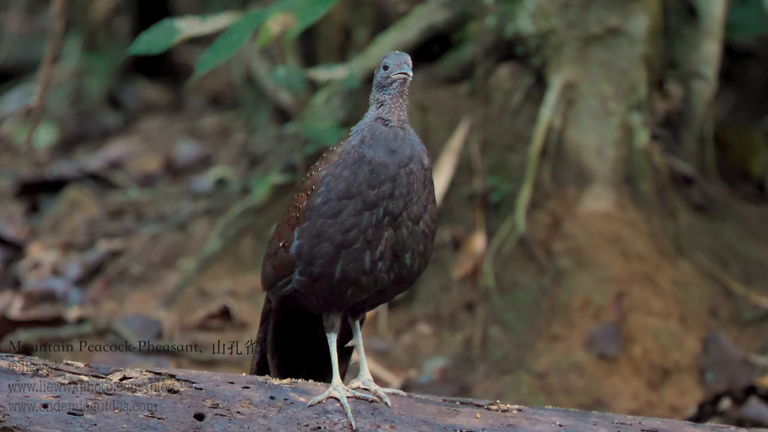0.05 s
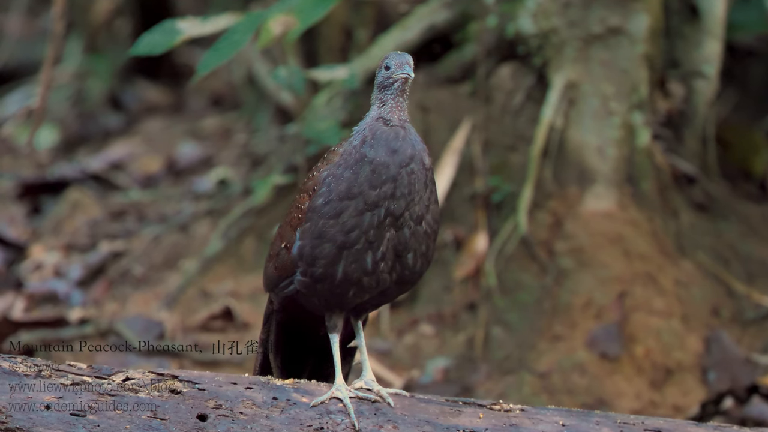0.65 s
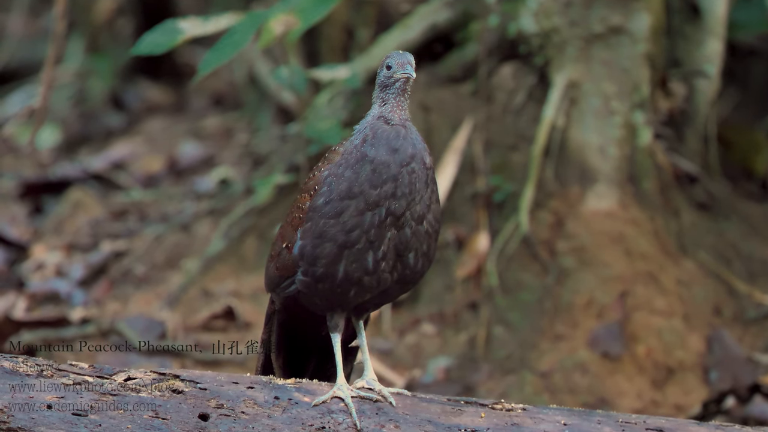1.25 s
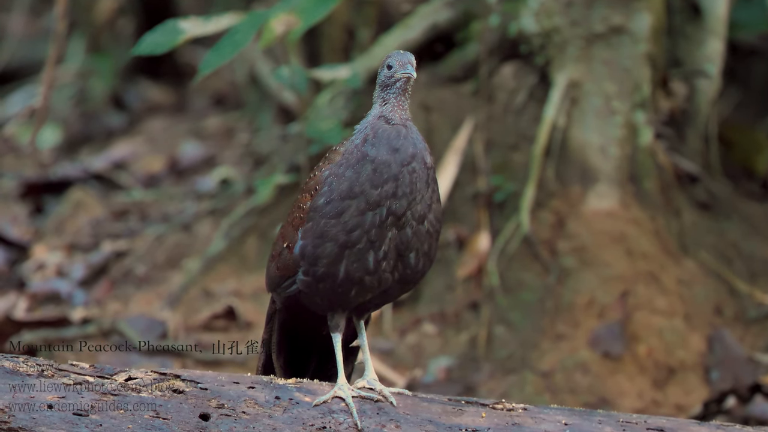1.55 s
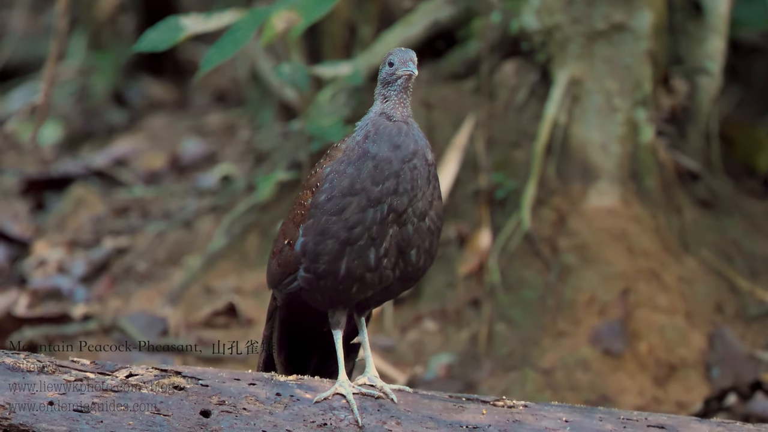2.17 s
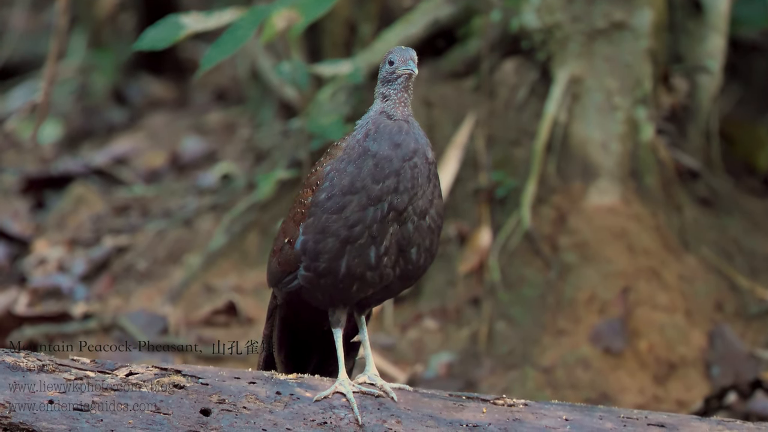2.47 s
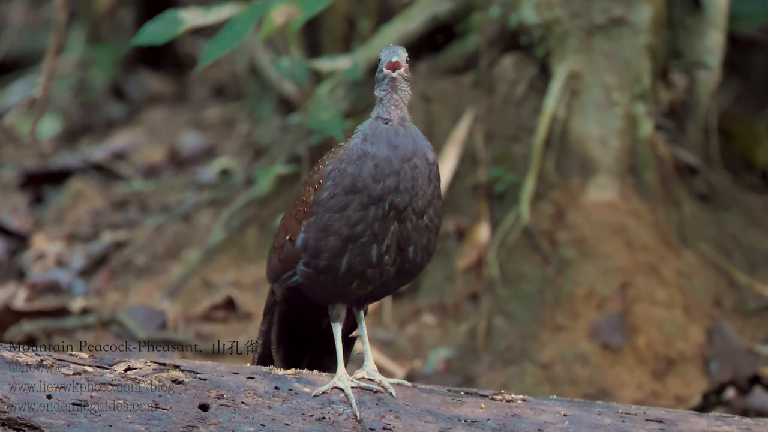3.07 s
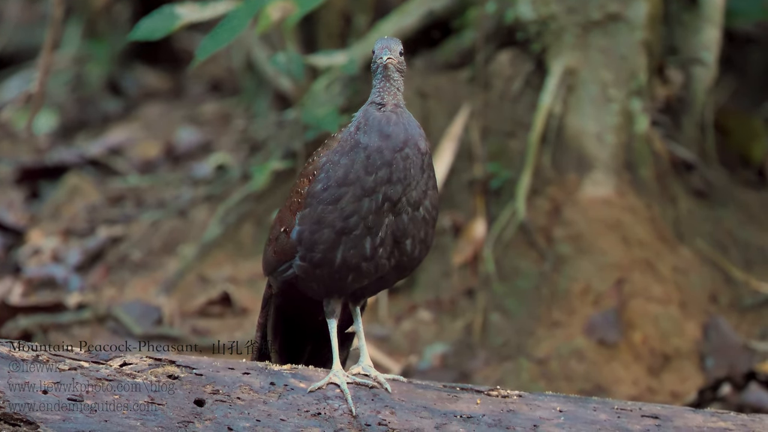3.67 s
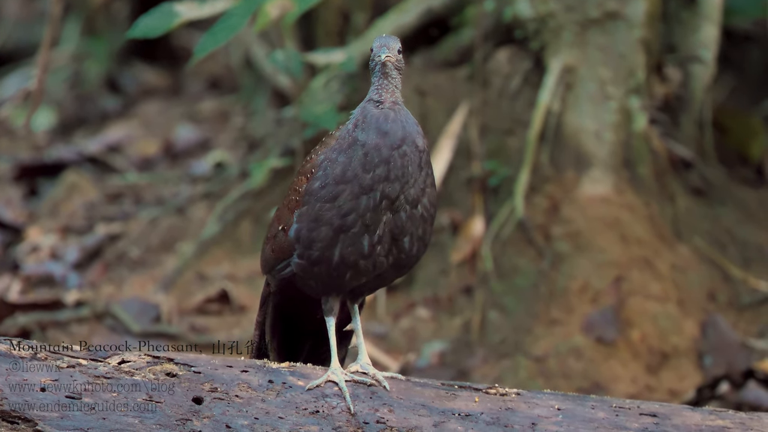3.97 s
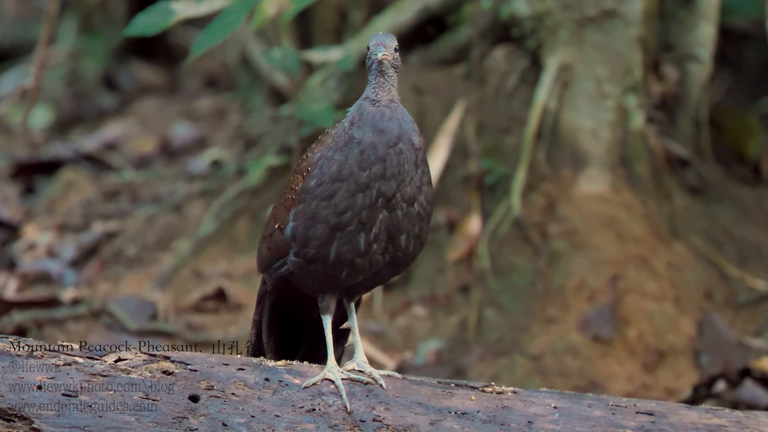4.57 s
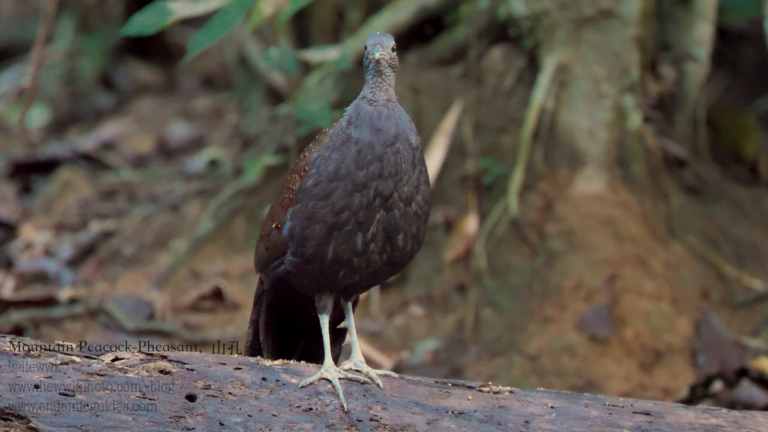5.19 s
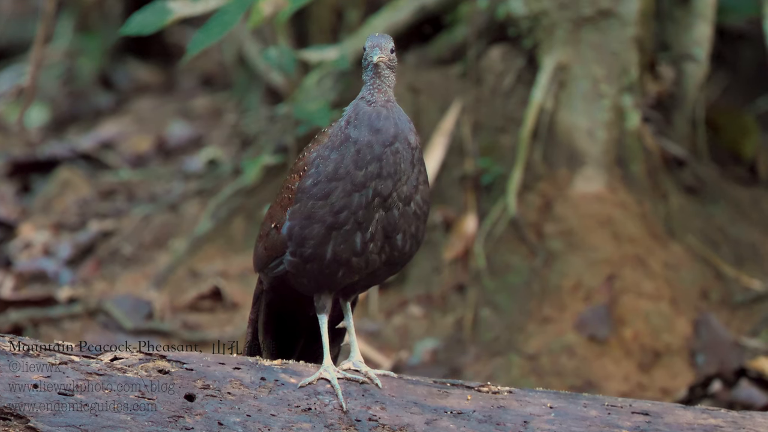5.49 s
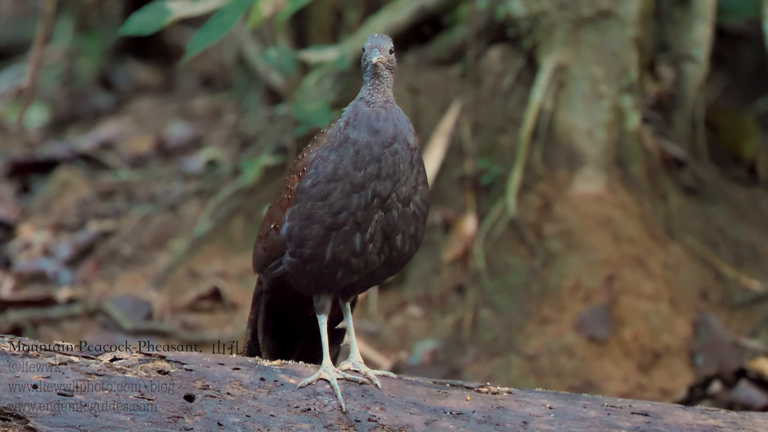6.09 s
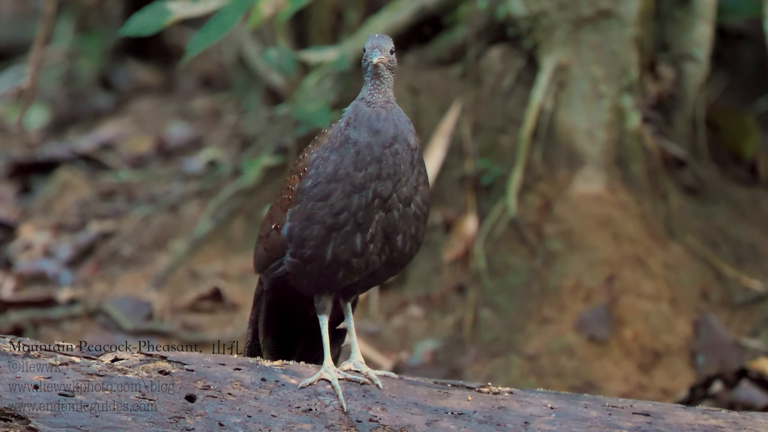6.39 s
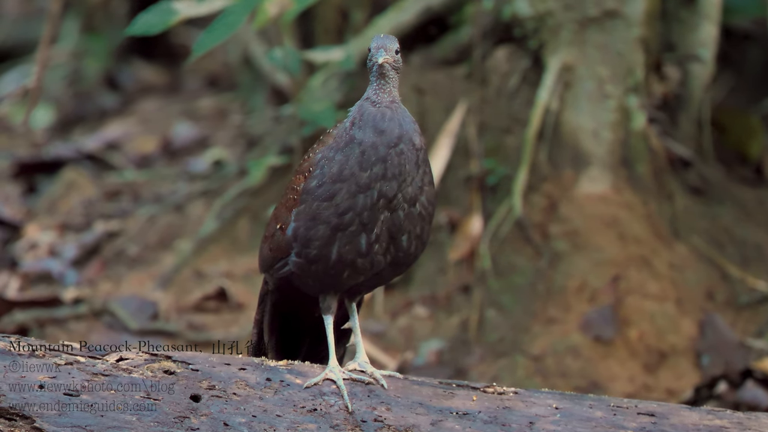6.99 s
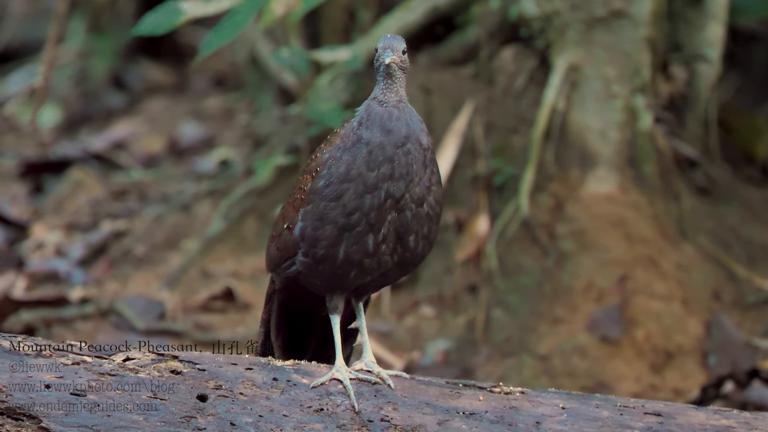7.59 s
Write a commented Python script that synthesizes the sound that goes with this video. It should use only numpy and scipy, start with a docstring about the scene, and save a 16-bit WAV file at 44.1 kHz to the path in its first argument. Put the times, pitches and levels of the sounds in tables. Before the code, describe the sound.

A nearby pheasant squawks twice, loud and raspy, each short note breaking from a growl into a fluttering cry with a brief forest echo. Before and after, the forest is quiet: a soft hiss, gently swelling insects, a thin high cricket and faint distant bird calls. Small ticks of falling debris come now and then, and a quick double crackle of dry leaves follows a while after the calls.

```python
"""Pheasant in a tropical forest.

A pheasant on a log gives two harsh, warbling notes: its syrinx vibrates, throat and windpipe resonate,
and the trees scatter the sound. Dry leaves crackle twice nearby and debris ticks on the forest floor.
A cricket chirps by scraping its wings, insects chirr all around and small birds call far away,
over a low murmur and a steady hiss."""
import sys
import numpy as np
from scipy import signal
from scipy.fft import rfft, irfft, next_fast_len
from scipy.io import wavfile
from scipy.ndimage import map_coordinates

SR = 44100
rng = np.random.default_rng(int(sys.argv[2]) if len(sys.argv) > 2 else 0)


def waveform_to_disk(signal):
    """Save audio, clipped to [-1, 1], as 16-bit WAV at the path in sys.argv[1]."""
    frames = np.transpose(np.atleast_2d(signal))
    scaled = np.clip(frames, -1, 1) * 32767
    samples = np.round(scaled).astype(np.int16)
    wavfile.write(sys.argv[1], SR, samples)


N = 346185
TIME = np.arange(N) / SR


# Resonances of the throat and open beak. Each row: frequency in Hz, gain in dB.
THROAT = [(250, -11), (550, -31), (850, -21), (1200, -12.5), (1450, -2.5), (1680, -2.5), (1850, -11),
          (2080, -31.5), (2600, -47.5), (3350, -31), (4100, -67), (5000, -37.5), (7600, -38.5), (9000, -71)]

def voiced_tone(pitch, phase, fundamental_db):
    """Source and filter: each harmonic of the syrinx is weighted by the throat as it sweeps through."""
    k = np.arange(1, 17)[:, None]
    gains = amp(along(THROAT, k * pitch) + fundamental_db * (k == 1))
    tone = np.sqrt(2) * np.sum(gains * np.sin(k * phase), axis=0)
    slackness = np.clip(1.2 - pitch / 800, 0, 1)  # a slack membrane flaps unevenly
    return tone * (1 + .25 * slackness * wobble(600, len(pitch)))


# Spectrum of air torn at the syrinx. Each row: frequency in Hz, relative level in dB.
RASP = [(500, -33.5), (900, -8.5), (1700, -1), (2600, -7), (3550, -5), (4000, -36), (4900, -9),
        (7700, -5.5), (8500, -14.5), (9100, -41), (10800, -18), (12000, -6.5), (13800, -22.5),
        (16000, -28.5)]
# Narrow resonances of the windpipe. Each row: centre in Hz, width in Hz, lift in dB.
WINDPIPE = [(3390, 240, 7), (5020, 140, 11), (5850, 220, 5.5), (7300, 280, 5), (7660, 160, 5.5)]

def rasp(phase):
    """Pulsed turbulence: air escapes in uneven puffs, once a cycle, and rings the windpipe."""
    puffs = rng.standard_normal(len(phase)) * (1 + np.cos(phase)) * amp(1.5 * wobble(250, len(phase)))
    pipe_db = lambda hz: sum(lift * band(centre, width)(hz) for centre, width, lift in WINDPIPE)
    return unit(filtered(puffs, lambda hz: amp(along(RASP, hz) + pipe_db(hz))))


SLACK_HZ, GROWL_RISE_S, BREAK_S, CRY_RISE_S, DROP_S = 262.6, .0105, .032, .014, .015
WARBLE_HZ, CREST_AT_S, WARBLE_GROW_S, WARBLE_TONE_DB, WARBLE_RASP_DB = 46.1, .1, .027, 2, 4
HARSH_AT_S, HARSH_SPREAD_S = .039, .019
JITTER, BREAK_JITTER = .009, .024  # shares of the pitch

def squawk(attack, length, release, growl_hz, cry_hz, growl_db, cry_db, sag_db_per_s,
           depth, fundamental_db, rasp_db, flare_db):
    """Tension sets pitch: the membrane tightens to a growl, breaks into a warbling cry and slackens."""
    t = np.arange(0, length + 2 * release, 1 / SR)
    crying = settle(t - BREAK_S, CRY_RISE_S)
    held = 1 - settle(t - length, DROP_S)
    breaking = np.exp(-((t - HARSH_AT_S) / HARSH_SPREAD_S) ** 2)
    turn = 2 * np.pi * WARBLE_HZ * (t - CREST_AT_S)
    swing = np.cos(turn) + .15 * np.cos(2 * turn)  # crests sharper than troughs
    warble = settle(t - BREAK_S, WARBLE_GROW_S) ** 2 * held * swing
    rise_hz = (growl_hz - SLACK_HZ) * settle(t, GROWL_RISE_S) + (cry_hz - growl_hz) * crying
    jitter = (JITTER + BREAK_JITTER * breaking) * wobble(700, len(t))
    pitch = (SLACK_HZ + held * rise_hz) * (1 + depth * warble + jitter)
    phase = 2 * np.pi * np.cumsum(pitch) / SR
    db = growl_db + (cry_db - growl_db) * crying - sag_db_per_s * np.maximum(t - BREAK_S, 0)
    release_db = -33 * (np.maximum(t - length, 0) / release) ** 2
    envelope = amp(db + release_db) * settle(t, attack) ** 3
    tone = amp(WARBLE_TONE_DB * warble) * voiced_tone(pitch, phase, fundamental_db)
    breath = amp(rasp_db + flare_db * breaking + WARBLE_RASP_DB * warble) * rasp(phase)
    return envelope * (tone + breath)


# The pheasant's notes. Each row: start, attack, length and release in seconds, growl and cry pitch in Hz,
# growl and cry gain in dB, sag in dB per second, warble depth as a share of the pitch, then fundamental
# gain, rasp gain, rasp flare at the break, reverberation gain and pan, all in dB.
NOTES = [(2.625, 0.011, .17, 0.034, 532.2, 888.8, -18.5, -13, 17.5, 0.165, 0, -27.5, 8.5, -0.5, .3),
         (3.024, .0075, .146, .02, 621, 859.4, -17, -12, 50.5, 0.085, -3, -29, 11, -1, -1.5)]
# Reflections from log, ground and nearest trunks. Each row: delay in seconds, gain in dB.
REFLECTIONS = [(.0013, -19.5), (.0045, -36), (.0059, -29), (.0095, -22), (0.0179, -24)]

def pheasant():
    """Interference: early reflections comb-filter each note before it reverberates among the trees."""
    comb = lambda hz: 1 + sum(amp(db) * np.exp(-2j * np.pi * hz * delay) for delay, db in REFLECTIONS)
    out = np.zeros((2, N))
    for start, *voice, wet_db, pan_db in NOTES:
        call = np.zeros(N)
        add(call, start, squawk(*voice))
        out += forest(filtered(call, comb), wet_db, pan_db)
    return out


def tick(db, centre_hz, octaves, rise_s, decay_s):
    """Impact excitation: a noise burst, dying 30 dB in decay_s, drives one broad resonance."""
    t = np.arange(SR // 10) / SR
    resonance = lambda hz: 1 / (1 + (np.log2((hz + 1) / centre_hz) / octaves) ** 2)
    # thin in the bass, with a dip near 9 kHz
    colour = lambda hz: resonance(hz) * hz / (hz + 300) * amp(-14 * band(9100, 1000)(hz))
    envelope = amp(-30 * t / decay_s) * settle(t, rise_s) ** 2
    envelope /= envelope.max()
    burst = filtered(envelope * rng.standard_normal(len(t)), colour)
    return amp(db - 14) * unit(burst) * np.std(envelope)


# Spectrum of rubbing leaves. Each row: frequency in Hz, relative level in dB.
LEAF = [(100, -48), (280, -8.5), (530, -16), (950, -3.5), (1600, 0.5), (2700, -7), (3350, -1.5),
        (4300, -11.5), (5400, -12), (7300, -4), (9000, -20.5), (12000, -16.5), (15500, -25)]
# Leaves dragged over the ground. Each row: start in seconds, length in seconds, level in dB.
SCUFFS = [(5.445, 0.064, -40.5), (5.557, 0.054, -36)]
# Leaves and twigs snapping. Each row: start in seconds, relative level in dB, resonance in Hz,
# width in octaves, decay in seconds.
SNAPS = [(4.126, -31.5, 11200, 1.4, 0.007), (5.447, -18.5, 2900, 0.94, 0.0028),
         (5.478, -21, 2000, 2.2, 0.018), (5.4982, -11, 1660, .92, 0.013), (5.503, -24.5, 2000, 4.5, 0.06),
         (5.563, -12.5, 1484, 0.29, 0.014), (5.5952, -17.5, 1790, 0.81, 0.0097),
         (5.5982, -15.5, 2200, 3.6, 0.013), (5.6095, -45, 1310, 1.34, .012)]
SNAP_RISE_S = .00035

def dry_leaves():
    """Friction and brittle fracture: leaves drag grainily, and each snap opens with a bright crack."""
    grains = rng.standard_normal(N) * amp(3.5 * wobble(1500))
    drag = sum(amp(db) * swell(start, length, rise_s=.0022, fall_s=.011) for start, length, db in SCUFFS)
    leaves = drag * unit(filtered(grains, lambda hz: amp(along(LEAF, hz))))
    for start, db, hz, octaves, decay_s in SNAPS:
        add(leaves, start, tick(db, hz, octaves, SNAP_RISE_S, decay_s))
        crack = tick(db - 3.5, centre_hz=8930, octaves=.91, rise_s=SNAP_RISE_S, decay_s=.0015)
        add(leaves, start + SNAP_RISE_S, crack)
    pair = forest(leaves, wet_db=-17.5, pan_db=-7)
    lag_s = .35 / SR * np.array([[1], [-1]])  # the sound arrives a hair later on the left
    return filtered(pair, lambda hz: np.exp(-2j * np.pi * hz * lag_s))


# Debris landing. Each row: start in seconds, relative level in dB, resonance in Hz,
# width in octaves, decay in seconds.
LANDINGS = [(0.67, -44.5, 6370, 0.41, .02), (1.032, -40, 6800, 0.28, .039), (2.122, -45, 5900, .18, 0.033),
            (2.194, -31, 1480, .85, 0.039), (3.619, -36, 4150, 0.32, 0.038),
            (4.264, -39.5, 7260, .3, 0.056), (5.354, -46, 7050, .6, .013), (6.874, -28, 2280, 0.4, 0.022),
            (7.384, -31.5, 1520, 1, 0.041)]

def debris():
    """Soft impact: bits landing on the forest floor tick with a blunted onset."""
    out = np.zeros(N)
    for start, db, hz, octaves, decay_s in LANDINGS:
        add(out, start, tick(db, hz, octaves, rise_s=.0038, decay_s=decay_s))
    return forest(out, wet_db=-9, pan_db=-6)


# Bouts of even chirping. Each row: start in seconds, chirp period in seconds, number of chirps,
# wing strokes per chirp.
BOUTS = [(.417, .202, 3, 2), (.98, .157, 2, 2), (1.402, .22, 2, 2), (1.9, .228, 4, 2), (2.957, .246, 3, 2),
         (3.672, .208, 4, 2), (4.457, .087, 6, 1), (5.022, .193, 3, 2), (5.675, .183, 3, 2),
         (6.272, .221, 4, 2), (7.123, .2, 4, 2)]
STROKE_GAP_S = .047

def cricket(pitch_hz, stroke_s, db):
    """Stridulation: each wing stroke scrapes out a short tone that sags a little in pitch."""
    out, progress = np.zeros(N), np.arange(0, 1, 1 / (stroke_s * SR))
    centres = [start + i * period + j * STROKE_GAP_S
               for start, period, chirps, strokes in BOUTS for i in range(chirps) for j in range(strokes)]
    for centre in centres:
        hz = pitch_hz * (1 + .018 * (.5 - progress) + .0082 * wobble(447, len(progress)))
        start = centre - stroke_s / 2 + rng.normal(0, .0022)
        add(out, start, amp(db + rng.normal(0, 1)) * np.sin(np.pi * progress) * sine(hz))
    return forest(out, wet_db=-4, pan_db=-7.5)


# Swells of the insect chorus. Each row: crest time in seconds, width in seconds, lift in dB.
CHORUS_SWELLS = [(.4, .13, 4), (1.02, 0.23, 8), (1.72, .24, 9.5), (2.33, 0.19, 9.5), (3.02, 0.2, 8),
                 (3.88, 0.28, 7), (4.55, 0.15, 7.5), (5.04, 0.15, 10.5), (5.721, 0.26, 10), (6.42, 0.25, 9),
                 (7.08, 0.2, 10), (7.42, 0.17, 8), (7.79, 0.13, 9.5)]

def insect_chorus():
    """Incoherent summation: many insects merge into bands of noise, one swelling and three steady."""
    lift_db = sum(lift * np.exp(-((TIME - crest) / width) ** 2) for crest, width, lift in CHORUS_SWELLS)
    swelling = amp(-69.5 + lift_db + wobble(90)) * diffuse(band(4274, 190))
    steady = amp(-66) * diffuse(band(4450, 140))
    far_crickets = amp(-68.5) * diffuse(band(6470, 460))
    shrill = amp(-77.5) * diffuse(band(15480, 90))
    return swelling + steady + far_crickets + shrill


# Spells of louder whining. Each row: start in seconds, length in seconds, lift in dB.
WHINE_SWELLS = [(1.65, 0.55, 5), (5.145, 1.08, 5)]

def insect_whine():
    """Narrowband noise is heard as a pitch: a low whine that grows as the insect presses harder."""
    lift_db = sum(lift * swell(start, length, rise_s=.096, fall_s=.096)
                  for start, length, lift in WHINE_SWELLS)
    return amp(-66.5 + lift_db) * diffuse(band(2066, 70))


def insect_trill(pitch_hz, rate_hz, db):
    """Amplitude modulation: a small insect's even strokes chop one wavering tone into ticks."""
    strokes = (1 + np.cos(2 * np.pi * np.cumsum(rate_hz + .77 * wobble(3)) / SR)) ** 2
    scrape = sine(pitch_hz * (1 + .023 * wobble(400)))
    return forest(amp(db) * unit(strokes * scrape), wet_db=-5, pan_db=-1.5)


# A katydid's sizzles. Each row: start in seconds, length in seconds, level approached in dB.
SIZZLES = [(0.297, .85, -58), (6.003, 1.33, -61.5)]

def katydid():
    """Broadband stridulation: a very high sizzle builds up slowly, then stops."""
    envelope = sum(amp(db) * swell(start, length, rise_s=.6, fall_s=.07) for start, length, db in SIZZLES)
    return envelope * diffuse(band(14900, 3700))


def whistle(length, pitch_hz, fall, wander):
    """Frequency modulation: a pure note slides down and wavers, each by a share of its pitch."""
    progress = np.arange(0, 1, 1 / (length * SR))
    hz = pitch_hz * (1 + fall * (.5 - progress)) * (1 + wander * wobble(600, len(progress)))
    return np.sqrt(np.abs(np.sin(np.pi * progress))) * sine(hz)


# Thin whistles. Each row: start and length in seconds, pitch in Hz, relative level in dB,
# wander as a share of the pitch.
WHISTLES = [(0.75, 0.28, 3770, -62, .004), (0.966, 0.41, 4100, -71, 0.0059),
            (1.238, .25, 2920, -67.5, 0.011), (1.315, 0.19, 7460, -62, 0.056),
            (1.35, .18, 8200, -61, 0.031), (1.408, 0.21, 3390, -63.5, 0.012),
            (1.644, 0.18, 4720, -67, .009)]
# Runs of falling hoots. Each row: start in seconds, number of hoots, level in dB.
HOOTS = [(2.345, 2, -58), (4.113, 1, -57.5), (4.218, 1, -55.5), (5.862, 2, -56.5), (6.79, 3, -53.5),
         (7.543, 1, -61), (7.717, 2, -54.5)]
HOOT_HZ, HOOT_S, HOOT_GAP_S = 1040, .036, .053

def far_birds():
    """Reverberation conveys distance: much of each whistle and hoot arrives scattered by the trees."""
    whistles, hoots = np.zeros((2, N))
    for start, length, hz, db, wander in WHISTLES:
        add(whistles, start, amp(db - 4) * whistle(length, hz, fall=.004, wander=wander))
    for start, count, db in HOOTS:
        for i in range(round(count)):
            add(hoots, start + i * HOOT_GAP_S, amp(db) * whistle(HOOT_S, HOOT_HZ, fall=.22, wander=.0038))
    return forest(whistles, wet_db=4, pan_db=0) + forest(hoots, wet_db=-4, pan_db=0)


# Spectra of the distant murmur and the hiss above it. Each row: frequency in Hz, relative level in dB.
MURMUR = [(25, -61), (50, -39), (80, -10.5), (130, 0), (190, 0), (330, -2), (540, -6.5), (635, -3.5),
          (780, -9), (940, -1), (1400, -11.5), (1900, -9.5), (2600, -18), (4000, -44.5)]
HISS = [(1000, -7.5), (3000, 3), (3800, 0.5), (6200, -3.5), (8000, -6), (9100, -16), (10000, -9),
        (10800, -10), (12000, -2.5), (15600, 0)]
EBB_DB_PER_S = .3864

def air():
    """Ambient noise: the forest's low murmur slowly ebbs under a steady hiss."""
    murmur_db = -56 - EBB_DB_PER_S * TIME + .19 * wobble(17)
    murmur = amp(murmur_db) * diffuse(lambda hz: amp(along(MURMUR, hz)))
    hiss = amp(-60) * diffuse(lambda hz: amp(along(HISS, hz))) * amp([[-.7], [.7]])
    return murmur + hiss


# Spectrum thrown back by trunks and foliage. Each row: frequency in Hz, relative level in dB.
SCATTER = [(400, 0), (850, -6), (1500, -0.5), (3300, -1), (6500, 1), (12000, -1)]
# Decay among the trees. Each row: frequency in Hz, nominal reverberation time in seconds.
DECAY_TIMES = [(200, 0.24), (900, 0.81), (1650, 0.78), (3300, 1), (7000, 0.98), (12000, 0.57)]

def forest(x, wet_db, pan_db):
    """Multiple scattering: a diffuse tail follows the direct sound, which positive pan moves left."""
    scatter_noise = diffuse(lambda hz: amp(along(SCATTER, hz)), size=SR)
    hz, t, spectrum = signal.stft(scatter_noise, SR, nperseg=256)
    fall_db = -60 * t / along(DECAY_TIMES, hz)[:, None]
    # near trunks answer quickly, the deep forest faintly and for longer
    decay = (amp(fall_db * 1.69) + amp(fall_db * .6 - 16.5)) * settle(t, .00059)
    tail = signal.istft(spectrum * decay, SR, nperseg=256)[1]
    scattered = signal.fftconvolve(x[None], tail / np.linalg.norm(tail[0]), axes=1)[:, :N]
    return x * amp([[pan_db / 2], [-pan_db / 2]]) + amp(wet_db) * scattered


# Likeness of left and right. Each row: frequency in Hz, correlation from 0 to 1.
COHERENCE = [(100, 1), (500, 0.99), (1000, 0.66), (3000, 0.56), (7000, 0.34), (15000, 0.063)]

def diffuse(response, size=N):
    """A diffuse field: stereo noise of rms 1, coherent in the bass and unrelated in the treble."""
    angle = lambda hz: np.arccos(np.clip(along(COHERENCE, hz), -1, 1)) / 2
    split = lambda hz: response(hz) * np.array([np.cos(angle(hz)), np.sin(angle(hz))])
    mid, side = filtered(rng.standard_normal((2, size)), split)
    return unit(np.array([mid + side, mid - side]))


def amp(db):
    """Decibels to gain."""
    return 10 ** (np.asarray(db) / 20)


def unit(x):
    """Normalisation to rms 1."""
    return x / np.sqrt(np.mean(x ** 2) + 1e-20)


def along(points, hz):
    """Interpolation of (Hz, value) points on a log frequency axis."""
    freqs, values = np.transpose(points)
    return np.interp(np.log(hz + 1), np.log(freqs + 1), values)


def sine(hz):
    """An oscillator: phase is the integral of frequency."""
    return np.sin(2 * np.pi * np.cumsum(hz) / SR)


def wobble(rate, size=N):
    """Smooth random modulation, rate knots a second."""
    return map_coordinates(rng.standard_normal(int(size * rate / SR) + 4), [np.arange(size) * rate / SR])


def filtered(x, response):
    """Linear filtering: the spectrum of x times a frequency response."""
    size = x.shape[-1]
    padded = next_fast_len(size + 4096)
    return irfft(rfft(x, padded) * response(np.fft.rfftfreq(padded, 1 / SR)), padded)[..., :size]


def band(centre_hz, width_hz):
    """A resonance curve, its width taken at half amplitude."""
    return lambda hz: 1 / (1 + ((hz - centre_hz) / width_hz * 2) ** 2)


def settle(t, time_s):
    """Exponential approach from 0 to 1, beginning at t = 0."""
    return 1 - np.exp(-np.maximum(t, 0) / time_s)


def swell(start, length, rise_s, fall_s):
    """An envelope of exponential attack and release."""
    return settle(TIME - start, rise_s) * (1 - settle(TIME - start - length, fall_s))


def add(track, start, sound):
    """Superposition of a sound on the track, from start in seconds."""
    part = track[round(start * SR):][:len(sound)]
    part += sound[:len(part)]


def scene():
    """Superposition: all the voices of the forest add."""
    foreground = pheasant() + dry_leaves() + debris() + cricket(pitch_hz=6440, stroke_s=.021, db=-54)
    insects = insect_chorus() + insect_whine() + insect_trill(pitch_hz=3150, rate_hz=60, db=-70)
    return foreground + insects + katydid() + far_birds() + air()


START_S, FADE_IN_S, TOP_HZ = .358, .0055, 15800

def record(dry):
    """Gating and band limiting: the sound opens after a short silence, with nothing above TOP_HZ."""
    gate = np.clip((TIME - START_S) / FADE_IN_S, 0, 1)
    return filtered(dry * gate, lambda hz: hz < TOP_HZ)


dry = scene()
out = record(dry)
waveform_to_disk(out)
```